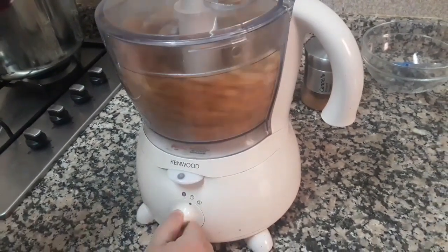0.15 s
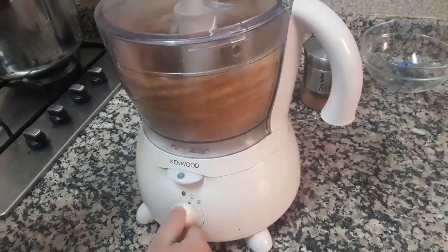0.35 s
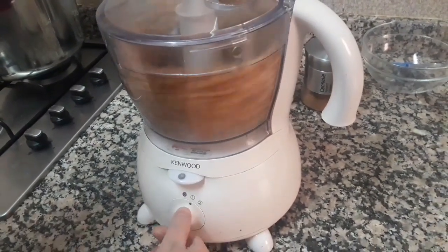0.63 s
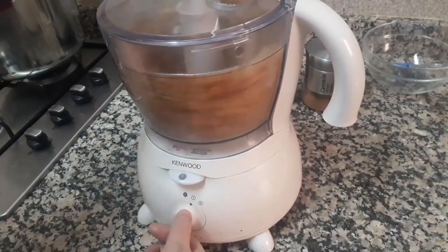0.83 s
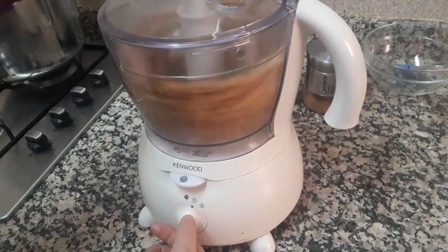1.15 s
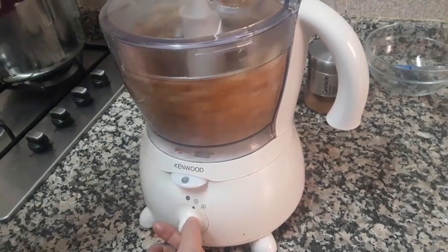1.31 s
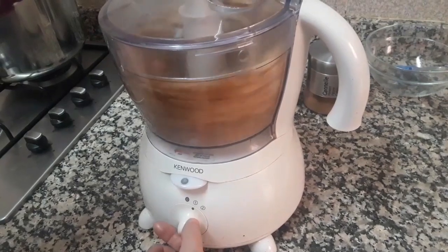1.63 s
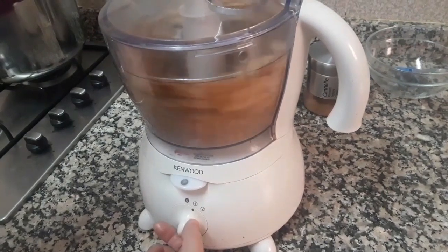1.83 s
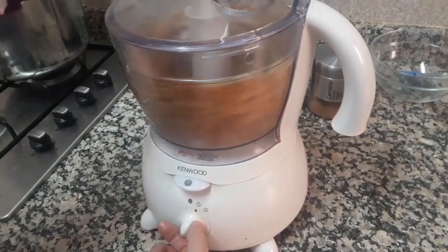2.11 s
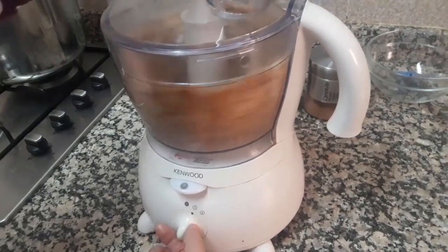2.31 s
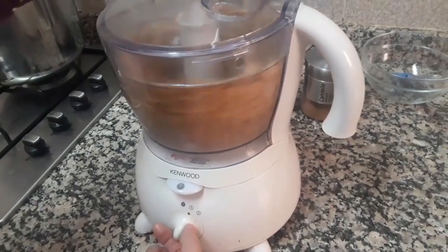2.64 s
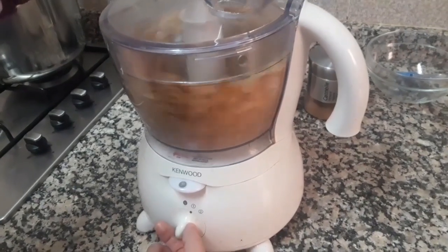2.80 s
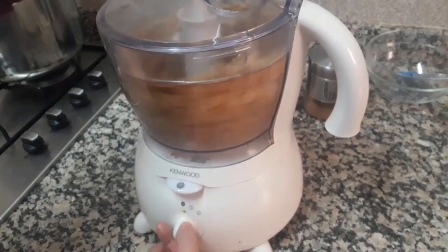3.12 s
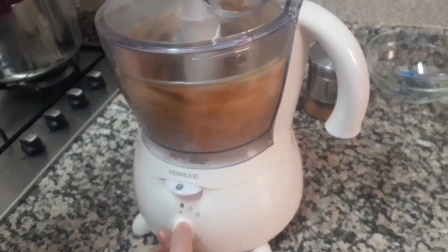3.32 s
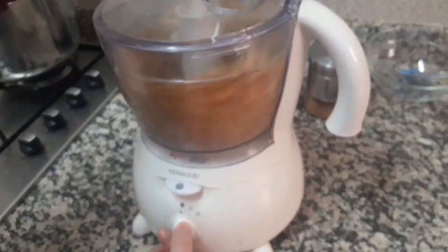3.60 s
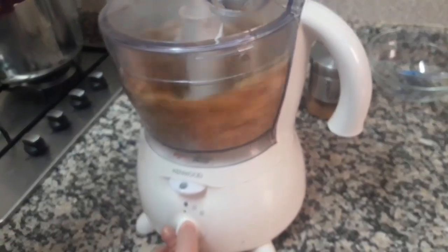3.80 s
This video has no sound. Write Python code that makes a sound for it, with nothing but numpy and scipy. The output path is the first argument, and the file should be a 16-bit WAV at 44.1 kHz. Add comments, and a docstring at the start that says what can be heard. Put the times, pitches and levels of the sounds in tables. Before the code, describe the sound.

A food processor chops hard nuts from the very start: a loud, bright, gritty swish of dense ticks, with irregular hard knocks and splintering cracks throughout. Beneath lie a low rumble and hum; a faint wavering whine, near 1080 Hz, comes and goes from 0.7 to 3.4 s. Dull thumps join after 3.1 s; from about 3.4 s the whirl becomes lumpier, falling nearly silent by 3.95 s. Close phone microphone, slight kitchen reverberation, softly overloaded.

```python
"""A dense, clumping swish and clatter of hard nuts is heard first, over a low motor rumble and hum.
A food processor chops them on a stone counter, close to a phone microphone: filtered noise gives the
swish, random impulses the ticks, and short splintering or ringing bursts the cracks and knocks.
A wavering sine adds the motor's whine; dull thumps join late, and at the end the whirl dies down."""
import sys
import numpy as np
from scipy import signal
from scipy.io import wavfile
from scipy.ndimage import uniform_filter1d

SR = 44100
rng = np.random.default_rng(int(sys.argv[2]) if len(sys.argv) > 2 else 0)


def persist_wave(psi):
    """Save psi, clipped to +-1, as 16-bit WAV."""
    counts = np.round(np.clip(psi, -1, 1) * 32767).astype(np.int16)
    wavfile.write(sys.argv[1], SR, np.atleast_2d(counts).T)


N = 174195

# All levels hold ahead of the soft overload.
# Whirl of the nuts, above and below DULL_HZ: time_s, bright_level_db, dull_level_db
WHIRL_LEVELS = [(0.0, -11, -17), (0.05, -13, -22), (0.13, -12.5, -21), (0.43, -14, -24.5),
                (0.89, -14.5, -22.5), (2.1, -14, -23.5), (3.29, -15.5, -23.5), (3.37, -15.5, -24.5),
                (3.41, -15.5, -19), (3.46, -19, -28.5), (3.5, -16.5, -21.5), (3.81, -25.5, -28),
                (3.88, -31.5, -29), (3.95, -39, -37)]
# Motor and base: time_s, rumble_db, hum_db, deep_bass_db
MOTOR_LEVELS = [(0.0, -30.5, -27, -36), (0.1, -33.5, -29.5, -43), (1.08, -33, -28, -43.5),
                (2.33, -32.5, -28.5, -41.5), (2.53, -35, -27, -45), (2.74, -34.5, -30, -40.5),
                (3.06, -33.5, -28, -48), (3.39, -33.5, -27, -42.5), (3.78, -36.5, -32.5, -49),
                (3.95, -45, -37.5, -57)]
# Motor whine, before its random waver: time_s, pitch_hz, level_db
WHINE_COURSE = [(.68, 1056, -55), (.76, 1056, -34), (.95, 1070, -31.5), (1.2, 1082, -34),
                (1.6, 1077, -34.5), (1.8, 1076, -40), (1.95, 1078, -30.5), (2.28, 1082, -31.5),
                (2.4, 1084, -45), (2.62, 1082, -46), (2.7, 1081, -34), (3.2, 1084, -43), (3.4, 1080, -55)]
# Loudest cracks of large pieces: start_s, edge_peak_db, body_minus_edge_db
LARGE_CRACKS = [(0.0417, -13, -2), (0.2505, -10, 1), (0.2687, -10, -16), (0.3066, -20, -3),
                (0.379, -10, -8), (0.812, -9, 1), (0.9935, -14, -12.5), (1.5862, -17, -5),
                (1.6518, -12, -2), (1.8715, -13.5, 3), (2.0442, -13, -4), (2.1409, -11, -4),
                (2.2846, -8, -11), (2.3051, -21, -1), (2.6318, -10, 2), (2.6483, -17, -7),
                (2.7905, -19, -5), (2.8568, -10, 0), (2.9182, -8, 0), (2.989, -11, -9), (3.172, -14, -6),
                (3.357, -9, -1), (3.4114, -17, -14), (3.5537, -17, -4), (3.574, -15, 2), (3.613, -19, 0),
                (3.657, -15, 5), (3.7, -26, 4), (3.7513, -20, 10), (3.786, -26, 4), (3.8321, -17, -6), ]
# Hard knocks on the bowl wall: start_s, snap_peak_db
HARD_KNOCKS = [(0.2301, -5), (0.2781, -4), (0.4599, -1), (0.6923, -1.3), (0.799, -7), (0.9298, -6),
               (1.2394, -4.0), (1.4657, 0), (1.9142, -8), (2.2399, 3), (2.2933, -7), (2.523, -2.3),
               (2.578, 1), (2.8693, -1), (2.9598, -2.7), (3.0827, -4), (3.2004, -1), (3.248, -9),
               (3.413, -11), (3.6235, 3), (3.658, -8.1), (3.821, -13.3), (3.9123, -22), (3.9341, -22.8)]
# Dull tumbling thumps in the bowl as the load slows, before roughening: start_s, pitch_hz, peak_db
TUMBLING_THUMPS = [(3.066, 385, -25), (3.225, 1097, -22), (3.3, 289, -23), (3.305, 1141, -22),
                   (3.355, 1173, -21), (3.42, 840, -24.5), (3.49, 1167, -23), (3.69, 243, -27.5)]
# Colour of bowl and microphone: frequency_hz, density_db (per Hz)
BOWL_SPECTRUM = [(760, -35.5), (1300, -17.5), (1620, -12.5), (1900, -5.5), (2060, -10.5), (2240, -3.5),
                 (2590, -7), (2900, -2), (3180, -1.5), (3400, 1.5), (3700, -4), (4200, -6), (4600, -15.5),
                 (7260, -20.5), (8490, -30), (10400, -35), (11100, -28), (12000, -32), (12900, -34),
                 (13400, -34), (14200, -35), (15100, -34), (15800, -31)]
# Colour of the rumble: frequency_hz, density_db (per Hz)
RUMBLE_SPECTRUM = [(12, -46), (20, -2), (49, -11), (112, -1), (140, -3), (204, -3), (270, 1), (468, -1.5),
                   (552, -2.5), (700, -15), (910, -30), (1540, -120)]
# Colour of the hum: frequency_hz, density_db (per Hz)
HUM_SPECTRUM = [(380, -35), (650, -10.5), (704, -11.5), (926, -1), (1010, -1), (1040, -5), (1090, 4.5),
                (1230, -5.5), (1600, -6), (2080, -27), (3520, -120)]
# Ringing of the housing, first row in the rumble, the rest in the hum: frequency_hz, width_hz, level_db
HOUSING_MODES = [(246, 89, -10), (835, 73, -10), (890, 19, -18), (1113, 21, -7.5), (1157, 5, -13.5),
                 (1289, 12.5, -6.5)]

# Nuts: "body" lies below SPLIT_HZ and "edge" above it
SPLIT_HZ, DULL_HZ = 3740, 2330
TICKS_PER_S, TICK_SPREAD_DB = 1500, 3  # rate before clumping and thinning
TICKS_DB, TICK_EDGE_DB, SWISH_DB, SWISH_EDGE_DB = -5.5, 1.5, -3, -1.5
CLUMP_DB, EDGE_CLUMP_DB, TICK_CLUMP_DB, PATCH_DB = 0.17, 1, 3, 1.5
THINNING = 0.47  # share of the level loss that goes into fewer ticks
BURSTS_PER_S, BURST_S = 110, 0.0045
END_CLUMPING = 0.05  # clumps deepen by this share per dB of level loss

THUD_HZ = 165  # the deep bass lies below, the rumble above
KITCHEN_T60_S, KITCHEN_DB = 0.94, -13.5
KNOCK_HZ, KNOCK_SPREAD, KNOCK_S, KNOCK_RING_DB = 3440, 0.11, 0.0004, -5
SMALL_KNOCKS_PER_S, SMALL_KNOCKS_DB = 160, -10
CRACK_RISE_S, CRACK_S = 0.00082, 0.0021
THUMP_S, THUMP_ROUGH = 0.0078, 0.6
TREBLE_LIMIT_HZ = 15790


def gain_of(db):
    """Amplitude ratio: 20 dB is a factor of ten."""
    return 10 ** (np.asarray(db) / 20)


def evened(x):
    """Normalization to unit root-mean-square level."""
    return x / np.sqrt(np.mean(x ** 2) + 1e-20)


def curve(table, column=1):
    """Linear interpolation: one column of a time table at every sample."""
    rows = np.array(table)
    return np.interp(np.arange(N) / SR, rows[:, 0], rows[:, column])


def colour(x, points):
    """Minimum-phase filtering: a causal response with the given spectrum, falling away outside it."""
    f, db = np.transpose(points)
    log_hz = np.log(np.abs(np.fft.fftfreq(8192, 1 / SR)) + 1)
    log_f = np.log(f + 1)
    outside = np.maximum(log_f[0] - log_hz, 0) + np.maximum(log_hz - log_f[-1], 0)
    level_db = np.maximum(np.interp(log_hz, log_f, db) - 30 * outside, -100)
    # the Hilbert transform of the log gain supplies the phase
    spectrum = np.exp(np.conj(signal.hilbert(np.log(gain_of(level_db)))))
    taps = np.fft.ifft(spectrum).real[:4096]
    return signal.oaconvolve(x, taps / np.linalg.norm(taps))[:len(x)]


def split(x, hz):
    """Zero-phase crossover: the low and high part of a sound."""
    return [signal.sosfiltfilt(signal.butter(3, hz, kind, fs=SR, output="sos"), x)
            for kind in ("low", "high")]


def patchy(x, patch_db):
    """Time-frequency modulation: random patches of level over time and frequency."""
    z = signal.stft(x, nperseg=512)[2]
    spots = rng.standard_normal(z.shape[::-1]).T
    spots = uniform_filter1d(spots, size=8, axis=0)
    spots = evened(uniform_filter1d(spots, size=4, axis=1))
    return signal.istft(z * gain_of(patch_db * spots), nperseg=512)[1][:N]


def bursts():
    """Shot noise: handfuls of nuts flung at the wall rise quickly and fade; slow swells even out."""
    flung = (rng.random(N) < BURSTS_PER_S / SR) * rng.exponential(1, N)
    rise = uniform_filter1d(flung, size=150) * 150
    fade = signal.lfilter([1], [1, -np.exp(-1 / (BURST_S * SR))], rise)
    level = np.log(0.35 + abs(fade))
    return evened(level - uniform_filter1d(level, size=4000))


def nuts():
    """Superposed random impacts: a swish of crumbs and separate ticks, all clumping.

    In the swish the treble clumps most."""
    level_db = curve(WHIRL_LEVELS)
    middle_db = np.median(level_db)
    clump = bursts() * (1 + END_CLUMPING * np.maximum(middle_db - level_db, 0))

    body, edge = split(patchy(rng.standard_normal(N), PATCH_DB), SPLIT_HZ)
    swish = body * gain_of(CLUMP_DB * clump) + edge * gain_of(SWISH_EDGE_DB + EDGE_CLUMP_DB * clump)

    luck, size, sign = rng.random(N), rng.exponential(1, N), rng.choice([-1., 1.], N)
    density = gain_of(TICK_CLUMP_DB * clump + THINNING * (level_db - middle_db))
    struck = luck < TICKS_PER_S / SR * density
    ticks = sign * gain_of(TICK_SPREAD_DB * np.minimum(size, 4)) * struck
    body, edge = split(evened(ticks), SPLIT_HZ)
    ticks = body + gain_of(TICK_EDGE_DB) * edge

    mix = gain_of(SWISH_DB) * evened(swish) + gain_of(TICKS_DB) * ticks
    dull, bright = split(colour(mix, BOWL_SPECTRUM), DULL_HZ)
    dull_db = curve(WHIRL_LEVELS, column=2)
    return gain_of(level_db) * evened(bright) + gain_of(dull_db) * evened(dull)


def resonate(x, hz, width):
    """Damped resonance of about unit peak gain, as a one-pole filter in a rotating frame."""
    turn = np.exp(2j * np.pi * np.cumsum(hz * np.ones(len(x))) / SR)
    r = np.exp(-np.pi * width / SR)
    return 2 * (turn * signal.lfilter([1 - r], [1, -r], x / turn)).real


def housing_ring(x, modes):
    """Modal superposition: the housing's resonances, all driven by one noise."""
    return sum(gain_of(db) * evened(resonate(x, hz, width)) for hz, width, db in modes)


def motor():
    """Forced vibration: lumpy rumble through the counter and a hum ringing in the housing."""
    a, b = rng.standard_normal((2, N))
    deep, rumble = split(patchy(colour(a, RUMBLE_SPECTRUM), patch_db=0.94), THUD_HZ)
    rumble = evened(evened(rumble) + housing_ring(a, HOUSING_MODES[:1]))
    hum = evened(patchy(colour(b, HUM_SPECTRUM), patch_db=1.5))
    hum = evened(hum + housing_ring(b, HOUSING_MODES[1:]))
    out = gain_of(curve(MOTOR_LEVELS)) * rumble
    out += gain_of(curve(MOTOR_LEVELS, column=2)) * hum
    return out + gain_of(curve(MOTOR_LEVELS, column=3)) * evened(deep)


def kitchen(x):
    """Reverberation: six sparse, decaying reflection patterns take turns, so no fixed colouration builds up."""
    out, at = np.zeros(N), np.arange(150, SR // 2 - 20, 20)
    turn = 2 * np.pi * 3.1 * np.arange(N) / SR
    for k in range(6):
        taps = np.zeros(SR // 2)
        taps[at + rng.integers(0, 20, len(at))] = rng.choice([-1., 1.], len(at))
        taps *= gain_of(-60 * np.arange(len(taps)) / SR / KITCHEN_T60_S)
        taps /= np.linalg.norm(taps)
        share = x * np.cos(turn + k * np.pi / 6) / np.sqrt(3)  # the six powers add up to one
        out += signal.oaconvolve(share, taps)[:N]
    return out


def knocks():
    """Impulse response: whole nuts hit the wall, a few hard and many lighter.

    Each gives a snap and some cycles of the bowl's main ring."""
    t, small = np.arange(400) / SR, np.zeros(N)
    snap = colour(1. * (t == 0), BOWL_SPECTRUM) * np.exp(-t / (2 * KNOCK_S))
    snap = snap / abs(snap).max()
    swell = t / KNOCK_S * np.exp(1 - t / KNOCK_S)

    def knock(tune, phase):
        """Damped oscillation: a snap of either sign with a ring of its own pitch and phase."""
        hz = KNOCK_HZ * (1 + KNOCK_SPREAD * (tune - 0.5))
        ring = swell * np.sin(2 * np.pi * (hz * t + phase))
        return snap * np.sign(phase - 0.5) + gain_of(KNOCK_RING_DB) * ring

    for tune, phase in rng.random((8, 2)):  # the lighter knocks share eight shapes
        struck = rng.random(N) < SMALL_KNOCKS_PER_S / 8 / SR
        hits = struck * gain_of(3 * np.minimum(rng.exponential(1, N), 4))
        small += signal.oaconvolve(hits, knock(tune, phase))[:N]
    out = gain_of(curve(WHIRL_LEVELS) + SMALL_KNOCKS_DB) * evened(small)
    for (s, db), draw in zip(HARD_KNOCKS, rng.random((len(HARD_KNOCKS), 2))):
        out[round(s * SR):][:len(t)] += gain_of(db) * knock(*draw)
    return out


def cracks():
    """Brittle fracture: each large piece splinters briefly, with its own balance of body and edge."""
    out, t = np.zeros(N + 1000), np.arange(800) / SR
    envelope = np.minimum(t / CRACK_RISE_S, 1) * np.exp(-t / CRACK_S)
    noise = rng.standard_normal((len(LARGE_CRACKS), len(t)))
    for (s, db, body_db), row in zip(LARGE_CRACKS, noise):
        body, edge = split(colour(row * envelope, BOWL_SPECTRUM), SPLIT_HZ)
        crack = edge / abs(edge).max() + gain_of(body_db) * body / abs(body).max()
        at = round(s * SR)
        out[at:at + len(t)] += gain_of(db) * crack
    return out[:N]


def chance(low_hz, high_hz):
    """Superposed sines: a slow random wobble between two rates, slightly stronger when slower."""
    t = np.arange(0, N + 64, 64) / SR
    rates = np.geomspace(low_hz, high_hz, 40)
    parts = sum(np.sin(2 * np.pi * (f * t + rng.random())) / f ** 0.046 for f in rates)
    return np.interp(np.arange(N) / SR, t, evened(parts))


def whine():
    """Frequency and amplitude modulation: the motor's tone wavers in pitch and level."""
    hz = curve(WHINE_COURSE) + 2.7 * chance(low_hz=3.4, high_hz=24.2)
    level_db = curve(WHINE_COURSE, column=2) + 3 * chance(low_hz=3, high_hz=20)
    tone = np.sqrt(2) * np.sin(2 * np.pi * np.cumsum(hz) / SR)
    return tone * gain_of(level_db)


def thumps():
    """Damped oscillation: each thump swells briefly and roughly at its own pitch."""
    t, out = np.arange(3000) / SR, np.zeros(N)
    grit = uniform_filter1d(rng.standard_normal((len(TUMBLING_THUMPS), len(t))), size=120, axis=1)
    for (s, hz, db), row in zip(TUMBLING_THUMPS, grit):
        swell = t / THUMP_S * np.exp(1 - t / THUMP_S) * (1 + THUMP_ROUGH * evened(row))
        out[round(s * SR):][:len(t)] += gain_of(db) * swell * np.sin(2 * np.pi * hz * t)
    return out


def scene():
    """Linear superposition: bowl sounds with their reflections, and the motor with its whine."""
    bowl = nuts() + knocks() + cracks() + thumps()
    return (bowl + gain_of(KITCHEN_DB) * kitchen(bowl) + motor() + whine())[None]


def record(dry):
    """Saturation and band limiting: soft overload, then a steep upper limit of the treble."""
    soft = 1.221 * np.tanh(dry / 1.417)
    treble_limit = signal.firwin(1201, TREBLE_LIMIT_HZ, window=("kaiser", 9), fs=SR)
    return signal.oaconvolve(soft, treble_limit[None], "same")


dry = scene()
out = record(dry)
persist_wave(out)
```